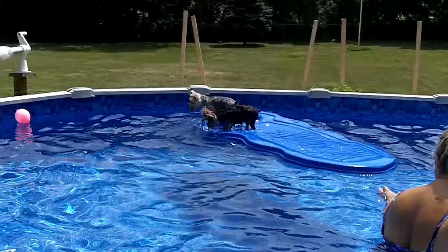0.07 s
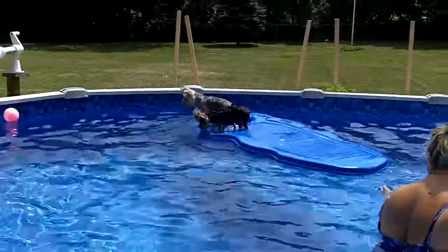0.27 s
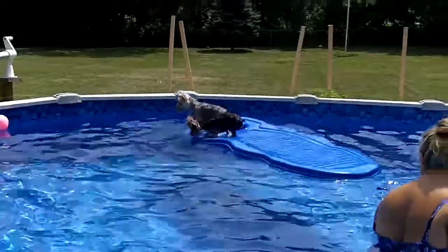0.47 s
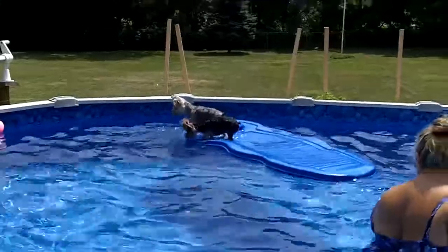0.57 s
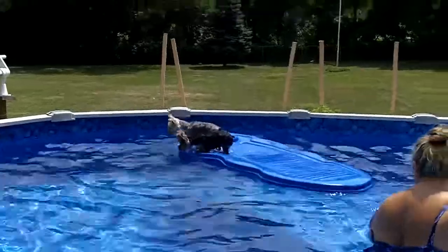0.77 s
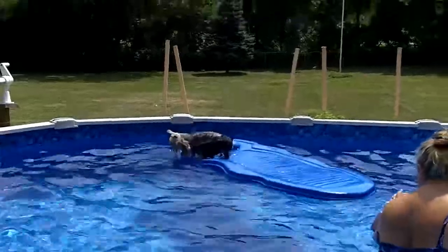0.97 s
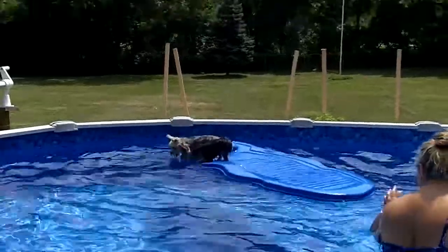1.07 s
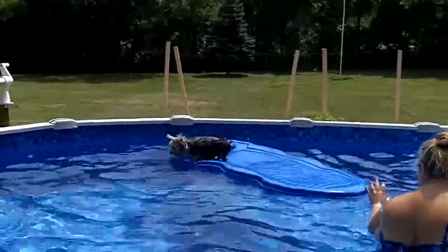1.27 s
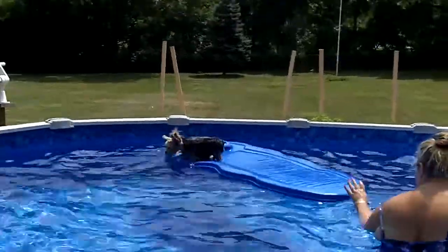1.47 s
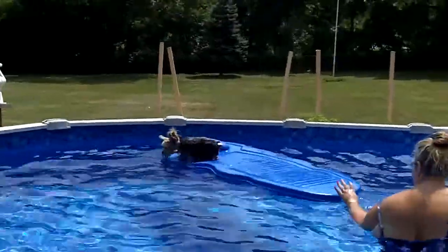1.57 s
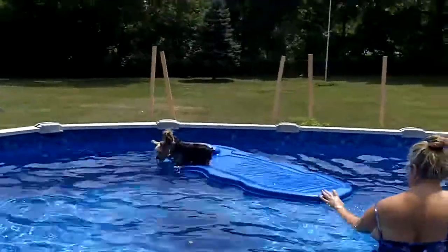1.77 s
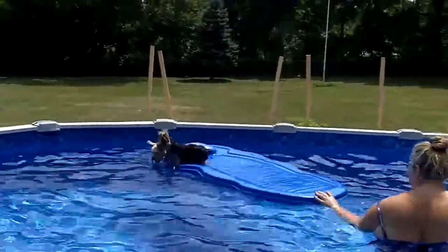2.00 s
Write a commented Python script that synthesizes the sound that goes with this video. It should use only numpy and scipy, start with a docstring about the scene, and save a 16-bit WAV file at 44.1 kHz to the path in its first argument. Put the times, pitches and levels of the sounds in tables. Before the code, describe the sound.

Water laps and plops lightly against a pool float over a steady low rumble.

```python
"""Dogs on a pool float

Small dogs shift about on a float in a backyard pool. In the middle distance water laps at its edge:
bubbles plop, little sloshes break, droplets tick and the float bumps softly. Behind it lie the steady
rumble and hum of what is probably the filter pump. A faint high whine flutters near the microphone,
which has a narrow notch in its treble."""
import sys
import numpy as np
from scipy import signal
from scipy.fft import rfft, irfft
from scipy.io import wavfile
from scipy.ndimage import uniform_filter1d

SR = 44100
rng = np.random.default_rng(int(sys.argv[2]) if len(sys.argv) > 2 else 0)


def materialize(psi):
    """Save the field psi as 16-bit PCM at rate SR to the path in sys.argv[1].

    A 1-D psi becomes a single channel; in a 2-D psi each row is a channel.
    """
    bounded = np.clip(np.atleast_2d(psi).T, -1, 1)
    quanta = np.round(bounded * 32767).astype(np.int16)
    wavfile.write(sys.argv[1], SR, quanta)


N = 89787


def amp(db):
    """Decibels to gain."""
    return 10 ** (np.asarray(db) / 20)


def unit_rms(x):
    """Scales to rms 1."""
    return x / np.sqrt(np.mean(x ** 2) + 1e-20)


def add(mix, start_s, sound):
    """Mixes a sound in at its start time."""
    part = mix[max(round(start_s * SR), 0):][:len(sound)]
    part += sound[:len(part)]


def drift(rate_hz):
    """A random wander of rms 1, moving at up to about this rate."""
    hz = np.fft.rfftfreq(N, 1 / SR)
    return unit_rms(irfft(rfft(rng.standard_normal(N)) * np.exp(-.5 * (hz / rate_hz) ** 2), N))


def air(spectrum, patch_db=1.1, hiss_from_hz=1700, frame=2048, hop=512):
    """Open-air noise of a given spectrum, with drifting patches; its treble swells slightly."""
    # Swell of the treble hiss: (time [s], gain [dB])
    hiss_swell = [(.16, 2.5), (.5, 1), (.95, 0.5), (1.1, 1.5), (1.35, -0.2), (1.7, 0.5), (1.84, 3),
                  (1.95, 2)]
    hz = np.fft.rfftfreq(frame, 1 / SR)
    real, imag, patches = rng.standard_normal((3, len(hz), N // hop + 5))
    t = np.arange(real.shape[1]) * hop / SR
    knot_hz, knot_db = np.transpose(spectrum)
    colour_db = np.interp(np.log(hz + 1), np.log(knot_hz), knot_db)
    patches = uniform_filter1d(patches, size=16, axis=0)
    patches = unit_rms(uniform_filter1d(patches, size=5, axis=1))
    treble_share = hz ** 2 / (hz ** 2 + hiss_from_hz ** 2)
    hiss_db = np.outer(treble_share, np.interp(t, *np.transpose(hiss_swell)))
    frames = (real + 1j * imag) * amp(colour_db[:, None] + patch_db * patches + hiss_db)
    return unit_rms(signal.istft(frames, nperseg=frame, noverlap=frame - hop)[1][:N])


def rumble(mid_db=-45.5, side_db=-63.5):
    """The backyard's steady, dark noise, nearly the same on left and right."""
    # Rumble and hiss common to both channels: (frequency [Hz], relative density [dB])
    mid_spectrum = [(12, -23.5), (40, 1), (105, 3), (140, -6), (220, -1.5), (320, -9.5), (620, -16),
                    (950, -16.5), (1600, -26.5), (3000, -36.5), (4600, -42.5), (6900, -43.5), (7900, -45),
                    (8700, -43), (9400, -53), (12000, -57), (14800, -62)]
    # Noise opposed between left and right: (frequency [Hz], relative density [dB])
    side_spectrum = [(25, 24), (60, 7.5), (140, -22), (300, -33), (700, -36), (1600, -18.5), (3600, -22),
                     (5500, -40), (7400, -49), (9300, -49), (12000, -27), (13300, -69)]
    return amp(mid_db) * air(mid_spectrum) + amp(side_db) * air(side_spectrum) * np.array([[1], [-1]])


def pump():
    """The hum behind the water: low tones and narrow resonances, steady in part and wavering."""
    # Pump tones: (frequency [Hz], rms level [dB], waver rate [Hz], wavering share [0-1])
    tones = [(24.5, -49.5, 0.99, 1), (58.53, -50, 4.1, 0.42), (85.43, -53.5, 9.1, 0.64),
             (119.5, -55, 2.7, 0.53), (428, -73.5, 9.3, 0.88), (545.4, -63, 6.7, 0.5), (760, -69, 15, 1)]
    t, out = np.arange(N) / SR, np.zeros(N)
    for hz, db, waver_hz, share in tones:
        steady = np.sqrt(2 * (1 - share ** 2))
        waver = share * (drift(waver_hz) + 1j * drift(waver_hz))
        carrier = np.exp(2j * np.pi * (hz * t + rng.random()))
        out += amp(db) * unit_rms(((steady + waver) * carrier).real)
    return out


def whine(pitch_hz=8850, swing_hz=140, jitter_hz=70, flutter_hz=58.3, flutter_depth=.81):
    """A thin high tone close to the microphone that swells each time its pitch swings up."""
    # Slow rise and fall of the whine: (time [s], level [dB])
    levels = [(.2, -103), (.8, -87), (1.2, -87), (1.55, -82), (1.8, -82.5), (2.03, -87)]
    t = np.arange(N) / SR
    flutter = np.sin(2 * np.pi * flutter_hz * t)
    hz = pitch_hz + swing_hz * flutter + jitter_hz * drift(rate_hz=320)
    tone = (1 + flutter_depth * flutter) * np.sin(2 * np.pi * np.cumsum(hz) / SR)
    return amp(np.interp(t, *np.transpose(levels))) * unit_rms(tone)


def wall_echoes(water, reflections_per_s=2000, gap_s=.003, t60=.09):
    """A short scatter of reflections inside the pool wall."""
    t = np.arange(SR // 4) / SR
    taps = rng.standard_normal(len(t)) * (rng.random(len(t)) < reflections_per_s / SR)
    taps *= (t > gap_s) * np.exp(-np.log(1000) * t / t60)
    return signal.fftconvolve(water, taps / np.linalg.norm(taps))[:N]


def bubble(hz, t60, rise_s, glide=.053):
    """A trapped air pocket rings and dies, its pitch climbing as it nears the surface."""
    t = np.arange(0, t60 + rise_s, 1 / SR)
    turns = hz * (t + glide * t ** 2 / (2 * t60))
    attack = np.minimum(t / rise_s, 1)
    decay = np.exp(-np.log(1000) * np.maximum(t - rise_s, 0) / t60)
    return attack * decay * np.sin(2 * np.pi * turns)


def ripples(bubbles_per_s=59, low_hz=330, octaves=2.9, faintest_db=-64.5, ring_cycles=47):
    """Faint bubbles of all sizes across the stirred pool."""
    out = np.zeros(N)
    for when, pitch, strength in rng.random((int(bubbles_per_s * N / SR), 3)):
        hz = low_hz * 2 ** (octaves * pitch)
        db = faintest_db + 2 * min(-np.log(1 - strength), 2)  # some stand out, by up to 4 dB
        add(out, when * N / SR, amp(db) * bubble(hz, t60=ring_cycles / hz, rise_s=1 / hz))
    return out


def drops(spray_t60=.012):
    """Flung droplets and small slaps land with one sharp tick and a brief spray."""
    # Strikes on the surface: (time [s], tick peak [dB], centre [Hz], spread [octaves], spray gain [dB])
    strikes = [(.2188, -46.5, 6100, .28, -8), (.4653, -35, 680, .98, -19), (.6194, -49.5, 6300, .48, -16),
               (1.6584, -46.5, 3000, .65, -15), (.312, -60, 3600, .4, -6), (.571, -60, 4500, .4, -6),
               (1.029, -60, 6500, .4, -6), (1.080, -57, 3900, .25, -6), (1.6355, -56.5, 7000, .25, -7),
               (1.6535, -55, 2700, .4, -14), (1.6602, -56, 8000, .4, -10), (1.6698, -59, 7200, .2, -10)]
    out, t = np.zeros(N), np.arange(2048) / SR
    hz = np.fft.rfftfreq(2 * len(t), 1 / SR)
    for time_s, db, centre_hz, octaves, spray_db in strikes:
        colour = np.exp(-.5 * (np.log2((hz + 1) / centre_hz) / octaves) ** 2)
        tick = np.fft.fftshift(irfft(colour))  # peaks mid-buffer, where the spray starts
        burst = rng.standard_normal(len(t)) * np.exp(-np.log(1000) * t / spray_t60)
        spray = irfft(rfft(np.r_[np.zeros(len(t)), burst]) * unit_rms(colour))
        add(out, time_s - len(t) / SR, amp(db) * (tick / tick.max() + amp(spray_db) * spray))
    return out


def sloshes(bubbles_per_s=1500, ring_cycles=6.7, densest_at=.22):
    """A wavelet folds over: a quick swell of tiny bubbles that thins out."""
    # Breaking wavelets: (time [s], length [s], level [dB], centre [Hz], spread [octaves])
    wavelets = [(.241, 0.056, -51.5, 505, 0.74), (0.463, .034, -51.5, 630, 0.55),
                (.527, .028, -53.5, 463, 0.5), (.963, 0.023, -66.5, 1970, 0.096),
                (1.003, .04, -67.5, 1920, .2), (1.067, .07, -70.5, 3470, 0.36),
                (1.473, .063, -50.5, 566, 0.54), (1.582, 0.0082, -66, 3200, .35),
                (1.585, .055, -47, 612, 0.45), (1.651, .026, -64.5, 2870, 0.57),
                (1.764, 0.15, -86, 8050, .42), (1.902, 0.039, -62.5, 1500, .61)]
    out = np.zeros(N)
    for start_s, length_s, db, centre_hz, octaves in wavelets:
        cloud, count = np.zeros(N), int(bubbles_per_s * length_s) + 1
        onsets = start_s + length_s * rng.triangular(0, densest_at, 1, size=count)
        pitches = np.minimum(centre_hz * 2 ** (octaves * rng.standard_normal(count)), SR / 4)
        for onset_s, hz in zip(onsets, pitches):
            gain = np.sqrt(centre_hz / (hz + centre_hz))  # smaller bubbles are quieter
            add(cloud, onset_s, gain * bubble(hz, t60=ring_cycles / hz, rise_s=.5 / hz))
        out += amp(db) * cloud / np.sqrt(np.sum(cloud ** 2) / (length_s * SR))
    return out


def bumps():
    """Water pushes under the float with a dull, quickly damped thump."""
    # Thumps under the float: (time [s], pitch [Hz], peak [dB])
    thumps = [(0.347, 92, -38), (1.149, 160.5, -41), (1.626, 68, -35.5)]
    out = np.zeros(N)
    for start_s, hz, db in thumps:
        add(out, start_s, amp(db) * bubble(hz, t60=.12, rise_s=.0085))
    return out


def plops():
    """Single bubbles ring out clearly at the edge of the float."""
    # Trapped air pockets: (time [s], pitch [Hz], peak [dB], ring t60 [s])
    pockets = [(.1962, 380, -36.5, 0.051), (0.234, 3900, -63, 0.022), (.2475, 370, -37.5, 0.068),
               (.263, 450, -40.5, 0.025), (.4638, 3420, -59, 0.017), (.538, 356, -35, 0.038),
               (1.012, 1850, -52, .025), (1.034, 2820, -53, .03), (1.067, 2030, -45, 0.0062),
               (1.1515, 1306, -38.5, 0.044), (1.163, 660, -45.5, 0.055), (1.174, 696, -48, .04),
               (1.483, 535, -45.5, 0.046), (1.492, 7000, -61, 0.018), (1.5868, 510, -38, 0.024),
               (1.589, 746, -41, 0.11), (1.597, 443, -41.5, 0.078), (1.5985, 776, -40.5, 0.036),
               (1.606, 206, -34.5, .12), (1.645, 1450, -45, 0.0045), (1.6592, 6750, -51.5, 0.0078),
               (1.6642, 3940, -60, 0.01), (1.745, 3060, -60, 0.023), (1.909, 727, -36.5, 0.047),
               (1.926, 729, -45.5, 0.09), (1.938, 489, -47, 0.29)]
    out = np.zeros(N)
    for start_s, hz, db, t60 in pockets:
        add(out, start_s, amp(db) * bubble(hz, t60, rise_s=.001))
    return out


def scene(echo_db=-17):
    """Lapping water in the middle distance, over the steady background of the yard."""
    water = plops() + bumps() + sloshes() + drops() + ripples()
    return rumble() + pump() + whine() + water + amp(echo_db) * wall_echoes(water)


def record(dry, notch_hz=5463, notch_width_hz=2330, notch_db=-24.5,
           start_s=.1565, cut_in_s=.002, dc_offset=.0085, top_hz=15000):
    """The microphone notches the treble; the recorder cuts in with a small offset and limits the band."""
    detune = (np.fft.rfftfreq(N, 1 / SR) - notch_hz) / (notch_width_hz / 2)
    notch = np.sqrt((detune ** 2 + amp(notch_db) ** 2) / (detune ** 2 + 1))
    notched = irfft(rfft(dry) * notch, N)
    gate = np.clip((np.arange(N) / SR - start_s) / cut_in_s + .5, 0, 1)
    padded = np.pad((notched + dc_offset) * gate, ((0, 0), (255, 255)), mode="edge")
    lowpass = signal.firwin(511, top_hz, window=("kaiser", 9), fs=SR)
    return signal.oaconvolve(padded, lowpass[None], "valid")


dry = scene()
out = record(dry)
materialize(out)
```